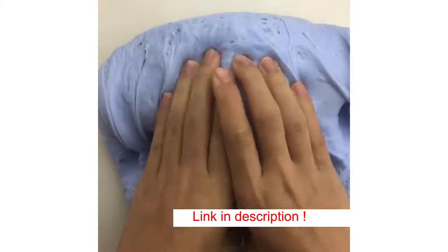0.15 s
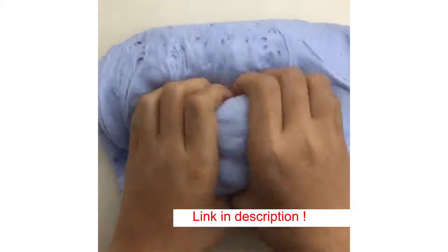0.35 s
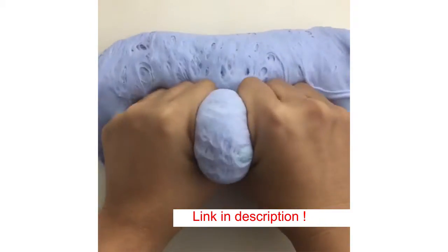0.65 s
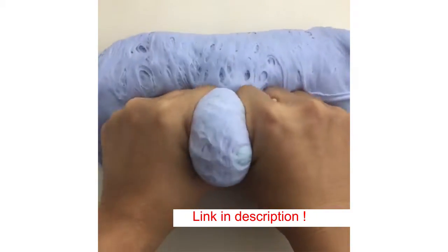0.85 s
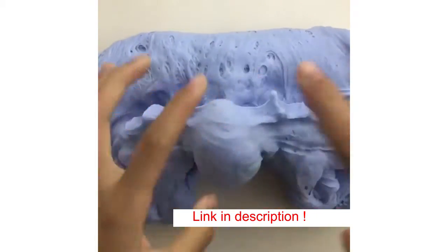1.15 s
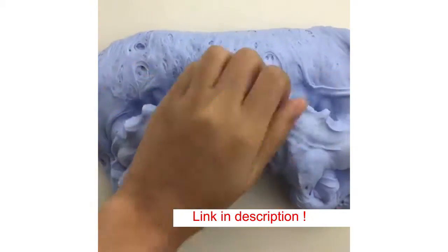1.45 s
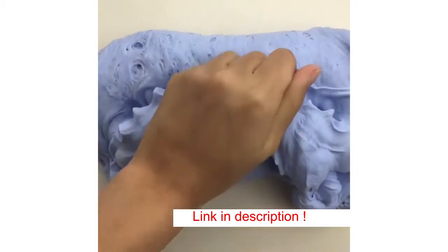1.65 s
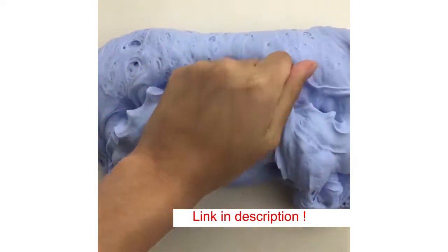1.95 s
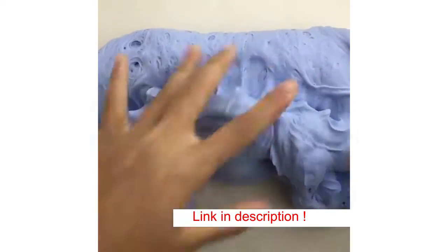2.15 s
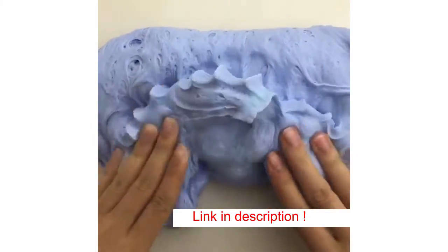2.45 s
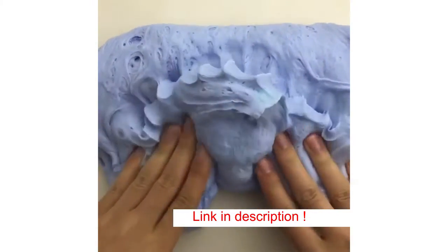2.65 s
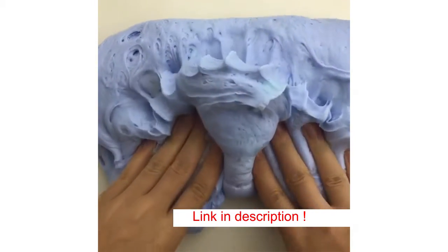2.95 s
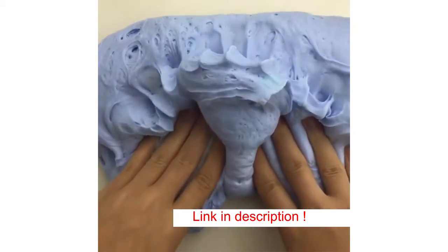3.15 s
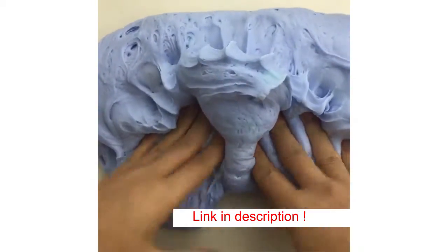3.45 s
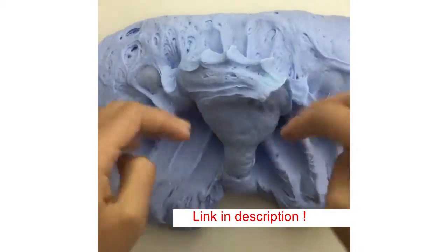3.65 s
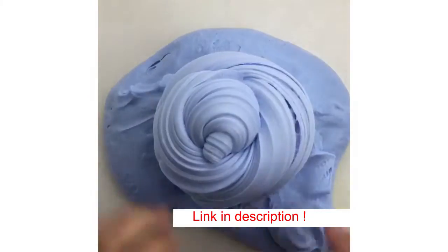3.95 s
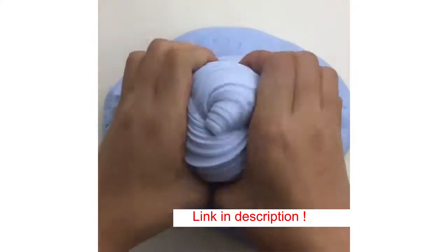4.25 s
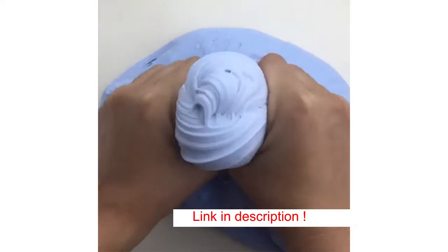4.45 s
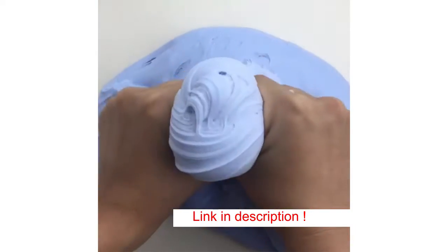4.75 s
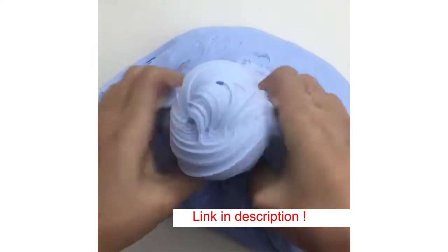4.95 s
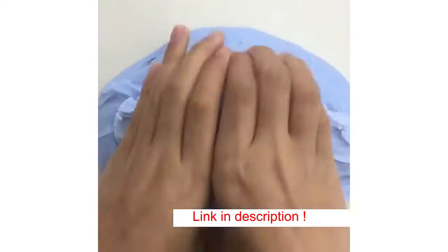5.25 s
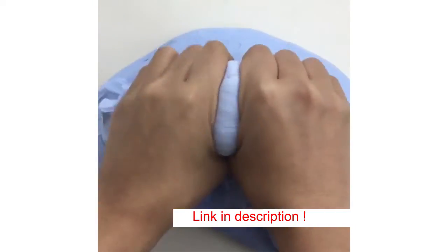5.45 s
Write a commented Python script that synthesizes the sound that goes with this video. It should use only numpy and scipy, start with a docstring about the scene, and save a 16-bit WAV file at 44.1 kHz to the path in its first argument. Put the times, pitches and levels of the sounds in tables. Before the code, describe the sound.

Hands squeeze and fold soft slime up close; trapped air bursts in sharp irregular pops, with sticky fizzing peels and low soft thuds between.

```python
"""Slime kneading, close up

Two hands knead a soft lump of slime on a table, close to a small microphone in a quiet room.
Trapped air pockets burst as sharp pops: a snap and its scatter ring a cavity, and the biggest overload.
Palms peel off with a fizzing rasp made of thousands of grains, and the lump thuds as damped low cycles.
Shaped noise gives the foam's hiss, the soft rub of gliding hands and a dull rumble below.
Wet squeaks are short, unsteady sine chirps, and chance ticks are small pops that follow the foam's fizz."""
import sys
import numpy as np
from scipy import signal
from scipy.fft import rfft, irfft, next_fast_len
from scipy.io import wavfile
from scipy.ndimage import map_coordinates

SR = 44100
rng = np.random.default_rng(int(sys.argv[2]) if len(sys.argv) > 2 else 0)


def dump(signal):
    """Clip the signal to [-1, 1] and save it as 16-bit WAV at the path in sys.argv[1]."""
    limited = np.clip(np.atleast_2d(signal).T, -1, 1)
    pcm = np.round(limited * 32767).astype(np.int16)
    wavfile.write(sys.argv[1], SR, pcm)


N = 246959  # length in samples

# Levels of the layers stand before the trims in scene().
# The larger air pockets burst: start_s, level_db, snap_over_scatter_db, cavity_hz, body_db, edge_db, sizzle_db
AIR_POCKETS = [(0.2267, -32.5, -4, 8300, 9.5, -2, -3.5), (0.266, -39, -4, 8100, -0.5, -3, -2),
               (0.591, -34.5, 3, 8775, 2, -8.5, -9), (0.6036, -21.5, 5.5, 11300, -3, -6, 9.5),
               (0.6306, -19.5, 2.5, 2198, -5.5, -6, -3.5), (0.7326, -39.5, 1, 11980, 0, 1, 1),
               (0.765, -29, 3.5, 9720, 5.5, -3, -6.5), (0.8655, -11.5, -7, 5580, -7.5, 4, 0.5),
               (0.9107, -3, -15.5, 2587, -2, -2, -8.5), (1.521, -33.5, -0.5, 2046, -16, -4, -13.5),
               (1.5677, -39, -3, 6260, -2.5, -4, -2.5), (1.5933, -34, -1, 7170, -14.5, 0.5, -9.5),
               (1.6138, -33.5, 0, 9300, -14.5, 0, -4.5), (1.6473, -33.5, 1.5, 3430, -12.5, -0.5, -13.5),
               (1.714, -9.5, -6.5, 5450, -3, 6, -7.5), (1.7661, -26, -0.5, 9300, -8, 9, 1),
               (1.7779, -7.5, 2.5, 3460, -7, 7.5, -6), (1.9043, -20, 3.5, 6960, -3.5, -2.5, -5),
               (1.9912, -35.5, 3, 6900, -13, 6.5, 6.5), (2.0501, -7.5, -8.5, 3554, -3.5, -1, -4),
               (2.2147, -35, -2.5, 3560, -7.5, -3, -21), (2.6496, -36, 1.5, 3030, -12.5, -3.5, -19),
               (2.7028, -31.5, 3, 2040, -21, -10.5, -8.5), (2.711, -33.5, 1, 3210, -26.5, -11.5, -16),
               (2.7355, -19, 1.5, 2360, -1, -17.5, -23), (2.751, -24, 3, 2400, -6.5, -32, -31),
               (2.7678, -37, -0.5, 9750, 8.5, 1.5, -7), (2.8248, -32.5, 1, 6160, -10.5, 6, -11.5),
               (2.8925, -25, 1.5, 2530, 1.5, -8.5, -20), (2.9223, -39, 1.5, 5300, 3, 4, -6),
               (3.0105, -46.5, 3.5, 11500, 9, 17, 14.5), (3.1764, -43.5, -1.5, 5840, 1, -1, -12.5),
               (3.319, -27.5, 5, 1950, -12.5, -9.5, -12), (3.5542, -45, 5.5, 4720, -2.5, 8, -4),
               (3.7824, -47.5, 2, 5400, -1, 1.5, -6), (4.3198, -30, -1, 3190, 5.5, 0, -24),
               (4.4139, -25.5, -5, 11800, 3.5, -3, -6.5), (4.4289, -26.5, 1, 3530, -3.5, -4, -11),
               (4.4881, -6.5, -2, 3450, -5.5, -1.5, -13), (4.513, -26, -3.5, 8400, -11.5, 1.5, -5.5),
               (4.524, -28, -5, 5000, -7.5, -1, -6), (4.562, -22.5, -4, 5270, 1, 2, -5),
               (4.5769, -11.5, -1.5, 9100, 8.5, 4, 3), (4.5856, -11.5, 5, 5770, -4, 3, -10),
               (4.6125, -33, -3.5, 12860, -0.5, 4, 11), (4.6418, -26, -3, 5440, -9.5, 0, -0.5),
               (4.7, -30, -8.5, 11100, 0, 1.5, 2.5), (4.7113, -3.5, -4, 5420, 0, 4.5, -9),
               (4.7351, -8.5, 3, 8120, -4.5, 1.5, -9.5), (4.7762, -29.5, 1, 6420, -11, -5, -23),
               (4.7918, -0.2, -4.5, 7170, -4, 0, -6), (4.8199, -2.5, -5, 3520, -7, 6, -10),
               (4.9329, -31, -3.5, 3680, 2, -7, -35), (5.4305, -19, -4, 4130, -8.5, -7, -22),
               (5.517, -18.5, -3, 2740, 4.5, -2, -7), (5.5347, -25, 2, 5670, -11, -4, -10),
               (5.556, -23.5, -8, 3650, -16, -8, -12), (5.5623, -16.5, -3, 3625, -5, -0.5, -9),
               (5.583, -18.5, -3, 5620, -1.5, -5, -11)]
# The soft lump knocks on the table: crest_s, peak_db, pitch_hz (at the crest), rise_s, t60_s
TABLE_KNOCKS = [(0.308, -31, 235, 0.002, 0.083), (0.872, -9.5, 132, 0.00048, 0.0087),
                (0.92, -19, 146.6, 0.0023, 0.1), (1.116, -16, 183, 0.0069, 0.05),
                (2.223, -31, 192, 0.0039, 0.048), (2.746, -17.5, 177, 0.0023, .09),
                (2.911, -19.5, 233, 0.0086, 0.065), (3.657, -26, 151, 0.013, 0.17),
                (3.724, -15.5, 111.7, 0.04, 0.09), (3.779, -28, 118, 0.032, 0.22),
                (5.082, -21, 119, 0.0063, 0.37)]
# A palm peels off the slime: crest_s, rise_s, hold_s, rasp_db, rasp_sag_db (over the hold),
# smack_db, smack_sag_db (over the hold), fizz_over_rasp_db
PALM_PEELS = [(1.15, 0.045, 0.091, -28, 1.5, -29.5, 10.5, -2),
              (2.225, 0.068, 0.082, -33, 2.5, -38.5, 7, -1.5), (3.658, 0.061, 0.066, -32, 3, -38, -6, -3),
              (5.083, 0.039, .14, -20, 12.5, -24, 21, -3.5)]
# The fingers press in and hold: crest_s, rise_s, hold_s, rustle_db, sag_db (over the hold), fizz_over_rustle_db
FINGER_SQUEEZES = [(0.421, 0.14, 0.43, -50.5, -2.5, -0.56), (1.659, 0.14, .78, -54, -0.2, -3),
                   (2.755, 0.2, .55, -56.5, 10, -4), (4.441, .13, .36, -46, -2.5, .6),
                   (5.468, .09, .15, -50, 0.5, -3.5)]
# Skin slides over the slime: crest_s, rise_s, hold_s, level_db, sag_db (over the hold)
SKIN_SLIDES = [(0.135, .03, 0.082, -52, -1), (3.923, .015, 0.15, -55.5, 5), (4.13, 0.032, 0.19, -48, 5),
               (5.28, 0.018, 0.09, -60, 7)]
# Air squeaks out through a pinhole: crest_s, peak_db, pitch_hz, half_length_s
PINHOLE_SQUEAKS = [(0.906, -24.5, 3153, .006), (2.005, -34, 3480, 0.0033), (2.217, -24, 3480, 0.0065),
                   (4.372, -41.5, 3570, 0.017), (4.442, -28, 3620, 0.0062), (4.446, -28, 3410, 0.02)]
# Everything drops away for a moment: time_s, gain_db
LEVEL_DIP = [(3.85, -3), (3.864, -19.5), (3.885, -16), (3.905, -5)]

# Spectrum of the sticky threads letting go: freq_hz, density_db (per Hz, relative)
THREAD_SPECTRUM = [(150, -32.5), (250, -3), (386, -8), (460, 0), (576, 0), (662, -3.5), (875, -5.5),
                   (1010, -13.5), (1160, -5), (1280, -13), (2130, -5.5), (4410, -13.5), (11300, -16.5),
                   (13400, -18.5), (16000, -37.5)]
# Spectrum of the creeping foam: freq_hz, density_db (per Hz, relative)
FOAM_SPECTRUM = [(150, -32), (250, 4.5), (292, -5), (607, -3.5), (761, -13), (860, -8), (1420, -9.5),
                 (2020, -7), (2810, -11), (3170, -14), (6940, -16), (12300, -19.5), (16000, -33)]
# Spectrum of the dull background: freq_hz, density_db (per Hz, relative)
RUMBLE_SPECTRUM = [(12, -49.5), (20, -18.5), (38, -7.5), (59, 0), (181, -5.5), (251, -16), (347, -22),
                   (387, -28), (481, -19.5), (507, -36), (555, -33), (608, -24), (1500, -22.5), (1950, -52),
                   (3300, -120)]
# Spectrum of the pulled lump's wobble: freq_hz, density_db (per Hz, relative)
WOBBLE_SPECTRUM = [(40, -26.5), (80, -8), (115, -3), (200, -5), (300, -12), (500, -36.5)]
# Spectrum of skin rubbing on slime: freq_hz, density_db (per Hz, relative)
RUB_SPECTRUM = [(1000, -9), (1500, -6), (1900, -3), (2300, -3.5), (2700, -9.5), (5000, -17.5)]
# Colour that the table top and nearby surfaces lend: freq_hz, gain_db
TABLE_RESPONSE = [(60, -9), (130, 1.5), (300, -1), (480, 5), (720, -6.5), (880, 3.5), (1000, -3), (1180, 2),
                  (1400, -3.5), (2000, 1), (2800, -1.5), (3400, 1.5), (4600, -3.5), (6000, 0)]
# Decay of the room: freq_hz, t60_s
ROOM_DECAY = [(150, 1), (1000, 0.98), (3000, .45), (8000, 0.52), (14000, 0.33)]
# Dull top of the microphone: freq_hz, gain_db
MICROPHONE_RESPONSE = [(13600, 0), (14000, -8), (15700, -16)]

TOP_HZ = 16000  # where the treble is cut off
SQUEEZE_T60_S, PEEL_T60_S, SLIDE_T60_S = 0.2, 0.091, 0.48  # decay of each movement after its hold
FIZZ_SAG_DB = 2  # further sag of the peel's fizz over the hold
REST_RUSTLE_DB, REST_FIZZ_DB = -63, -68  # the foam left to itself
SETTLE_DB, SETTLE_T60_S = -38, 0.32  # foam rustling on over a burst pocket; level relative to its pop
# small pockets that burst by chance
TICKS_PER_S, TICK_DB, TICK_SPREAD_DB = 15, 6, 3.5  # level over the foam's fizz gain
TICK_HZ, TICK_OCTAVES = 6000, 0.6  # typical cavity and its spread
TICK_SNAP_DB = 1.5  # snap over its scatter
TICK_BODY_DB, TICK_EDGE_DB, TICK_SIZZLE_DB = -3, -1.3, -3


def amp(db):
    """Decibels to gain."""
    return np.exp(np.asarray(db) * np.log(10) / 20)


def unit(x):
    """Scale to rms 1."""
    return x / np.sqrt(np.mean(x ** 2) + 1e-20)


def along(points, hz):
    """Read (Hz, value) points on a log frequency axis."""
    f, v = np.transpose(points)
    return np.interp(np.log(hz + 1), np.log(f + 1), v)


def filtered(x, response):
    """Filter x by a gain given as a function of frequency."""
    m = next_fast_len(len(x) + 8192)  # padding keeps the filter's tail from wrapping round
    return irfft(rfft(x, m) * response(np.fft.rfftfreq(m, 1 / SR)), m)[:len(x)]


def band(x, colour, low_hz, high_hz):
    """One soft-edged band of x in the given colour, at rms 1."""
    def response(hz):
        low_edge = 1 + (low_hz / (hz + 1)) ** 10
        high_edge = 1 + (hz / high_hz) ** 10
        return amp(along(colour, hz)) / np.sqrt(low_edge * high_edge)
    return unit(filtered(x, response))


def causal(gain):
    """The quickest impulse response with this gain (minimum phase, by folding the cepstrum)."""
    cepstrum = irfft(np.log(np.maximum(gain, 1e-6)))
    half = len(cepstrum) // 2
    cepstrum[1:half] *= 2
    cepstrum[half + 1:] = 0
    return irfft(np.exp(rfft(cepstrum)))


def wander(rate):
    """A random curve joining `rate` knots a second by straight lines."""
    return map_coordinates(rng.standard_normal(N), [np.arange(N) * rate / SR], order=1)


def grains(rate, spread_db, hiss):
    """Tiny bursts at random moments and of random sizes, over a bed of white hiss."""
    sizes = amp(spread_db * np.clip(rng.standard_normal(N), -2, 2)) * rng.choice([-1, 1], N)
    bursts = sizes * (rng.random(N) < rate / SR)
    return unit(bursts) + hiss * rng.standard_normal(N)


def patchy(x, depth_db, width_hz, life_s):
    """The colour of x shifts at random in patches of a given width and life."""
    hz, t, z = signal.stft(x, SR, nperseg=256)
    rows, cols = np.meshgrid(hz / width_hz, t / life_s, indexing="ij")
    knots = rng.standard_normal((128, 1024))
    field = map_coordinates(knots, [rows, cols], order=1, mode="mirror")
    return signal.istft(z * amp(depth_db * field), SR, nperseg=256)[1][:N]


def swell(crest, rise, hold, db, sag_db, t60):
    """The gain of one hand movement: it swells to its crest, sags while held, then dies away."""
    t = np.arange(0, N, 100) / SR - crest  # coarse steps, joined up below
    attack = np.exp(-(np.minimum(t, 0) / rise) ** 2)
    sag = sag_db * np.clip(t / hold, 0, 1)
    release = 60 * np.maximum(t - hold, 0) / t60
    gain = np.maximum(attack * amp(db - sag - release), 1e-9)
    return np.interp(np.arange(N) / SR - crest, t, gain)


def rumble(level_db):
    """A steady dull background under everything: low-passed noise."""
    return amp(level_db) * band(rng.standard_normal(N), RUMBLE_SPECTRUM, 20, 700)


def room(x):
    """The walls answer with a diffuse tail whose lows ring longest."""
    hz, t, z = signal.stft(rng.standard_normal(SR // 2), SR, nperseg=256)
    decay = amp(-60 * t / along(ROOM_DECAY, hz)[:, None])
    build_up = 1 - np.exp(-t / 0.03)
    tail = signal.istft(z * decay * build_up, SR, nperseg=256)[1]
    return signal.fftconvolve(x, tail / np.linalg.norm(tail))[:N]


def sliding(level_db):
    """A soft rub as the hands glide into place: band-limited noise under slow swells."""
    glide = sum(swell(*slide, SLIDE_T60_S) for slide in SKIN_SLIDES)
    return amp(level_db) * glide * band(rng.standard_normal(N), RUB_SPECTRUM, 830, 6400)


def grip():
    """The gains of the foam's rustle and fizz under all the squeezes."""
    rustle, fizz = np.zeros(N), np.zeros(N)
    for s, rise, hold, db, sag, bright in FINGER_SQUEEZES:
        rustle += swell(s, rise, hold, db, sag, SQUEEZE_T60_S)
        fizz += swell(s, rise, hold, db + bright, sag, SQUEEZE_T60_S)
    return rustle, fizz


def settling():
    """The gain of the foam closing over burst pockets, in proportion to the size of each listed pop."""
    kicks = np.zeros(N)
    for s, db, *_ in AIR_POCKETS:
        kicks[round(s * SR)] = amp(db + SETTLE_DB) ** 2
    power_decay = amp(-60 / (SETTLE_T60_S * SR)) ** 2  # per sample
    return np.sqrt(signal.lfilter([1], [1, -power_decay], kicks))


def squeezing(rustle_db, fizz_db, settle_fizz_db, knead_db):
    """The foam hisses as it creeps; under firm pressure pinhead bubbles prickle in shifting colours."""
    (rustle, fizz), settle = grip(), settling()
    # the lump itself gives with a low, dull rustle
    knead = amp(knead_db) * rustle * band(rng.standard_normal(N), FOAM_SPECTRUM, 170, 400)
    rustle = np.sqrt(rustle ** 2 + settle ** 2 + amp(REST_RUSTLE_DB) ** 2)
    fizz = np.sqrt(fizz ** 2 + (amp(settle_fizz_db) * settle) ** 2 + amp(REST_FIZZ_DB) ** 2)
    pressure = fizz / (fizz + amp(-54.5))  # 0 loose to 1 firm
    bubbles = pressure * grains(rate=260, spread_db=6, hiss=0)
    bubbles = bubbles + (1 - 0.4 * pressure) * rng.standard_normal(N)
    prickle = patchy(bubbles, depth_db=2.5, width_hz=270, life_s=0.014)
    return (knead
            + amp(rustle_db) * rustle * band(prickle, FOAM_SPECTRUM, 490, 4200)
            + amp(fizz_db) * fizz * band(prickle, FOAM_SPECTRUM, 4500, 16000))


def squeaks(rough):
    """Air through a pinhole: short wet chirps, sines whose phase wanders."""
    out = np.zeros(N)
    drift = rough * wander(rate=1300)  # radians
    for s, db, hz, half in PINHOLE_SQUEAKS:
        t = np.arange(N) / SR - s
        out += amp(db) * np.exp(-(t / half) ** 2) * np.sin(2 * np.pi * hz * t + drift)
    return out


def thuds(uneven, sag):
    """The lump swings against the table for a few uneven, damped cycles, its pitch sagging as it spreads."""
    out = np.zeros(N)
    drift = uneven * wander(rate=190)  # radians
    for s, db, hz, rise, t60 in TABLE_KNOCKS:
        near = np.arange(round((s - 0.15) * SR), round((s + 0.3) * SR))
        t = near / SR - s
        envelope = np.exp(-(np.minimum(t, 0) / rise) ** 2) * amp(-60 * np.maximum(t, 0) / t60)
        sagging_time = t - sag * np.hypot(t, 0.004)  # faster before the crest, slower after
        out[near] += amp(db) * envelope * np.cos(2 * np.pi * hz * sagging_time + drift[near])
    return out


def palms():
    """The gains of smack, rasp and fizz: one movement drives all three."""
    smack, rasp, fizz = np.zeros(N), np.zeros(N), np.zeros(N)
    for s, rise, hold, rasp_db, sag, smack_db, smack_sag, bright in PALM_PEELS:
        smack += swell(s, rise, hold, smack_db, smack_sag, PEEL_T60_S)
        rasp += swell(s, rise, hold, rasp_db, sag, PEEL_T60_S)
        fizz += swell(s, rise, hold, rasp_db + bright, sag + FIZZ_SAG_DB, PEEL_T60_S)
    return smack, rasp, fizz


def peeling(smack_db, rasp_db, fizz_db, wobble_db):
    """Thousands of sticky threads let go of the skin in clumps, and the pulled lump wobbles."""
    smack, rasp, fizz = palms()
    clumps = amp(2 * wander(rate=260))
    threads = clumps * grains(rate=5000, spread_db=0.5, hiss=0.24)
    threads = filtered(threads, lambda hz: amp(0.44 * along(TABLE_RESPONSE, hz)))
    # the gaps that open under the palm keep changing their resonances
    threads = patchy(threads, depth_db=3.2, width_hz=300, life_s=0.014)
    return (amp(smack_db) * smack * band(threads, THREAD_SPECTRUM, 170, 1300)
            + amp(rasp_db) * rasp * band(threads, THREAD_SPECTRUM, 1300, 4500)
            + amp(fizz_db) * fizz * band(threads, THREAD_SPECTRUM, 4500, 16000)
            + amp(wobble_db) * smack * band(rng.standard_normal(N), WOBBLE_SPECTRUM, 40, 500))


def scatter(t, t60, linger_db, linger_t60):
    """Dense reflections from hands and table, of energy 1: a quick decay and a weaker slow one."""
    envelope = amp(-60 * t / t60) + amp(linger_db - 60 * t / linger_t60)
    echoes = rng.standard_normal(len(t)) * envelope * (1 - np.exp(-t / 0.0014))
    return echoes / np.linalg.norm(echoes)


def pop(level_db, snap_db, cavity_hz, body_db, edge_db, sizzle_db, size=4096):
    """A skin of slime tears: one snap and its scatter ring the opened cavity."""
    t, hz = np.arange(size) / SR, np.fft.rfftfreq(size, 1 / SR)
    # the tear takes a fraction of a millisecond: each pitch leaves at its own moment
    delay = np.interp(hz, np.linspace(0, TOP_HZ, 12), rng.uniform(0.00005, 0.0006, 12))
    snap = irfft(np.exp(-2j * np.pi * np.cumsum(delay) * SR / size))
    # a bigger pocket takes longer to empty
    t60 = 0.026 + 0.0058 * amp(level_db)
    burst = amp(snap_db) * snap + scatter(t, t60, linger_db=-20.5, linger_t60=0.12)
    burst = burst * np.minimum(1, 2 - 2 * t / t[-1])  # fade the second half
    tilt = [(900, body_db), (1800, 0.00043), (3200, 0), (5600, edge_db),
            (11000, sizzle_db), (15000, sizzle_db - 7.0)]
    cavity_db = 5 / (1 + ((hz - cavity_hz) / (0.13 * cavity_hz)) ** 2)
    ring = causal(amp(along(tilt, hz) + along(TABLE_RESPONSE, hz) + cavity_db))
    sound = signal.fftconvolve(burst, ring)[:size]
    # the level is the rms of the whole pop's energy packed into 10 ms
    return amp(level_db) * sound / np.linalg.norm(sound) * np.sqrt(SR / 100)


def ticks(count=100):
    """Small pockets burst at chance moments, one to each equal time slot, louder the firmer the squeeze."""
    out = np.zeros(N + SR)
    fizz = np.hypot(grip()[1], amp(REST_FIZZ_DB))
    starts = ((np.arange(count) + rng.random(count)) * SR / TICKS_PER_S).astype(int)
    chances = np.clip(rng.standard_normal((count, 2)), -2, 2)
    for start, (strength, pitch) in zip(starts, chances):
        level_db = TICK_DB + TICK_SPREAD_DB * strength
        cavity_hz = TICK_HZ * 2 ** (TICK_OCTAVES * pitch)
        sound = pop(level_db, TICK_SNAP_DB, cavity_hz, TICK_BODY_DB, TICK_EDGE_DB, TICK_SIZZLE_DB)
        if start < N:
            out[start:][:len(sound)] += fizz[start] * sound
    return out[:N]


def pops(level_db):
    """Every larger air pocket bursts with its own size and colour."""
    out = np.zeros(N + SR)
    for s, *pocket in AIR_POCKETS:
        sound = pop(*pocket)
        out[round(s * SR):][:len(sound)] += sound
    return amp(level_db) * out[:N]


def level_dip():
    """The gain of the moment when everything drops away."""
    s, db = np.transpose(LEVEL_DIP)
    return amp(np.interp(np.arange(N) / SR, s, db))


def scene():
    """Slime sounds in the room, over its background and a trace of microphone hiss."""
    slime = pops(level_db=1.3) + ticks() + squeaks(rough=1.3) + thuds(uneven=0.5, sag=0.07)
    slime = slime + peeling(smack_db=0.3, rasp_db=0.8, fizz_db=0.3, wobble_db=3)
    quiet = squeezing(rustle_db=2.0, fizz_db=-0.5, settle_fizz_db=-5, knead_db=-2.5)
    quiet = quiet + sliding(level_db=1.0) + rumble(level_db=-44.5)
    hiss = amp(-65) * rng.standard_normal(N)
    mix = slime + amp(-28.0) * room(slime) + quiet + hiss
    return (level_dip() * mix)[None]


def record(dry):
    """The big pops clip just below full scale; the top of the treble is dull, then cut off."""
    clipped = np.clip(dry[0], -0.97, 0.97)

    def response(hz):
        return amp(along(MICROPHONE_RESPONSE, hz)) / (1 + (hz / TOP_HZ) ** 150)
    return filtered(clipped, response)[None]


dry = scene()
out = record(dry)
dump(out)
```